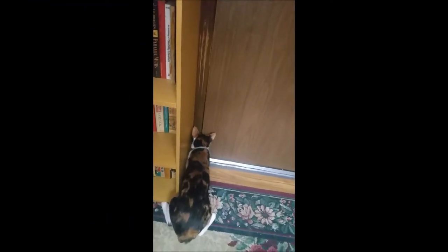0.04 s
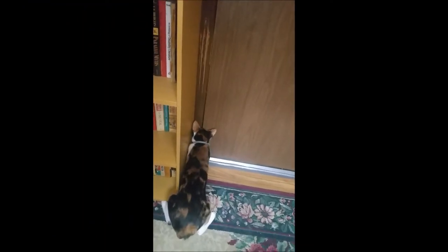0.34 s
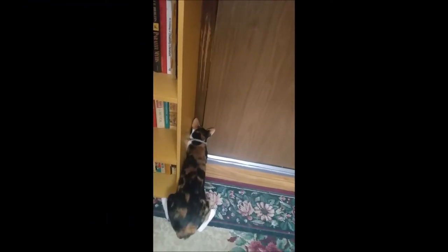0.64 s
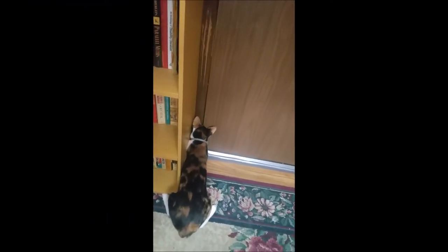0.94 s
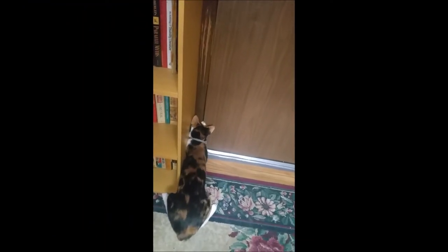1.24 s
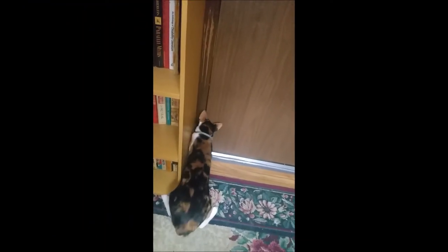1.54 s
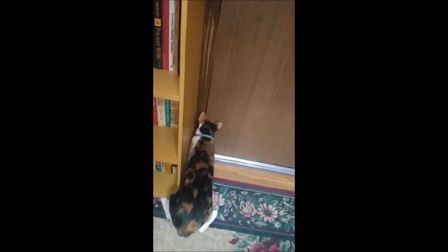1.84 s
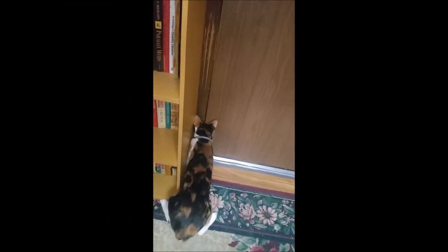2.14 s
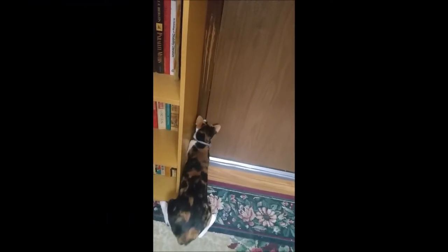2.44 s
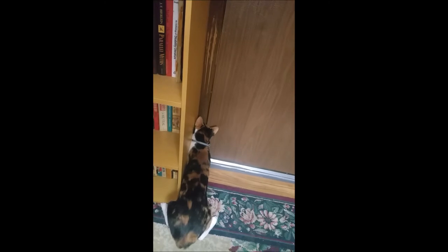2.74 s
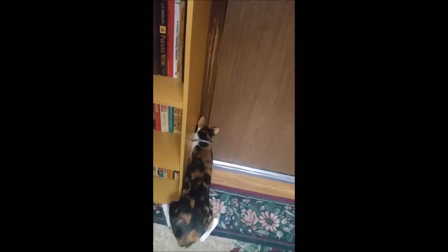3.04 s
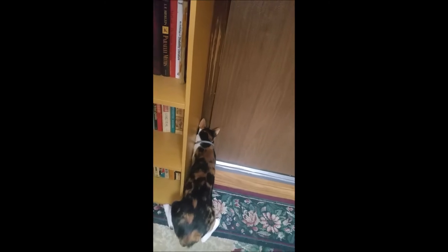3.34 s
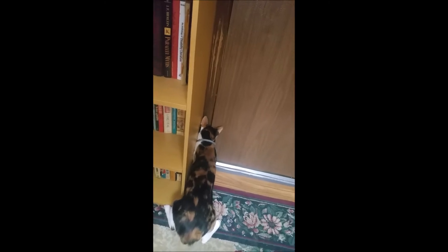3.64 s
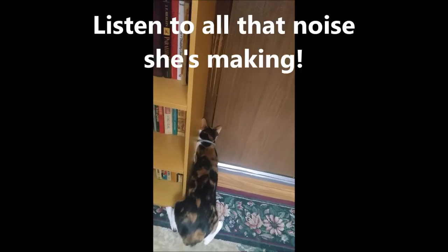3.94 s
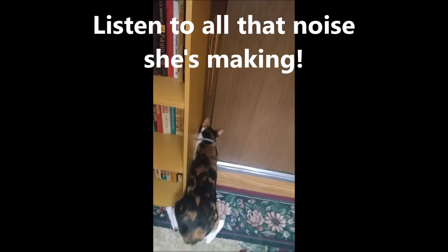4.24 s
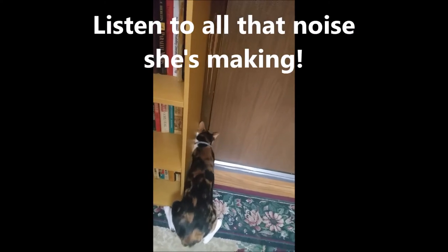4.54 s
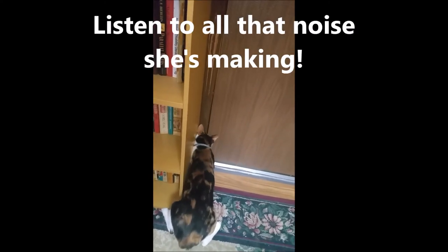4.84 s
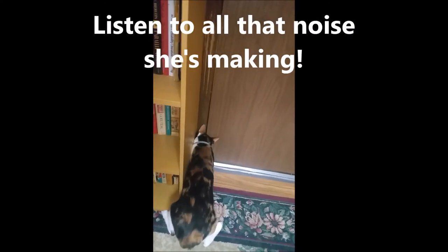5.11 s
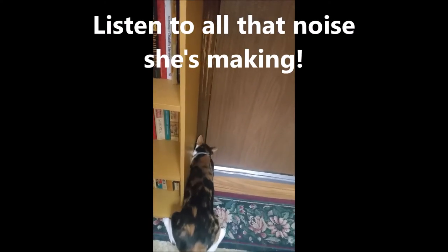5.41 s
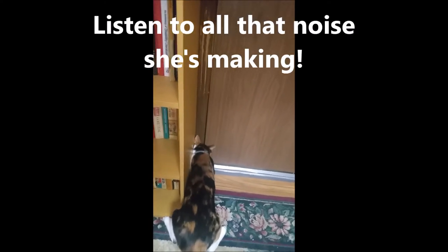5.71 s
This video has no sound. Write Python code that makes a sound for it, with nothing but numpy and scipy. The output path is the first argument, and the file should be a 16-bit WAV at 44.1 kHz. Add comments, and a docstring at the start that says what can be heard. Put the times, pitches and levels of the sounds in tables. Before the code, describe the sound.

A cat tugs at a closed wooden door, making irregular hollow knocks and rattles with light claw ticks in between.

```python
"""Cat pawing at a closed door

A small carpeted room, a stereo pair of microphones a step behind the cat. Each tug knocks the loose
wooden door against its latch and frame: a crack, the panel's hollow ring and a slow boom of the whole
leaf. Between tugs her claws tick and scrape along the edge, over a quiet rumble and an appliance hum."""
import sys
import numpy as np
from scipy import signal
from scipy.fft import rfft, irfft, next_fast_len
from scipy.io import wavfile
from scipy.ndimage import map_coordinates

SR = 44100
rng = np.random.default_rng(int(sys.argv[2]) if len(sys.argv) > 2 else 0)


def generate_wav(sig):
    """Save sig (samples, or channels by samples) to the path in sys.argv[1] as 16-bit PCM at SR."""
    pcm = np.round(np.clip(np.atleast_2d(sig).T, -1, 1) * 32767).astype(np.int16)
    wavfile.write(sys.argv[1], SR, pcm)


N = 263277
AGE = np.arange(SR * 3 // 5) / SR  # time since a contact [s]

# the door hitting its frame, some tugs rattling it several times:
# (time [s], latch crack [dB], panel thud [dB], edge snap [dB])
DOOR_KNOCKS = [(.833, -29, -39, -56), (.837, -19, -30.5, -36.5), (0.8497, -26, -29, -35.5),
               (0.8745, -29, -33, -42.5), (1.391, -55, -52, -71), (1.457, -50, -48, -68),
               (1.5254, -27, -42, -49), (1.602, -48.5, -49, -57.5), (1.8483, -15, -26, -25),
               (1.862, -22.5, -29.5, -38), (2.2259, -20.5, -23.5, -35), (3.208, -47, -51, -62.5),
               (3.346, -30, -31, -42.5), (3.4339, -39.5, -45, -61.5), (3.525, -47.5, -49, -62),
               (4.2363, -56.5, -48, -69), (4.369, -36, -32, -43), (4.377, -28, -31, -43),
               (4.3931, -26, -21.5, -33.5), (4.842, -45, -56, -57), (4.9194, -18.5, -26.5, -32),
               (5.216, -30, -35.5, -49), (5.239, -39, -35, -52), (5.2646, -28.5, -25, -35),
               (5.8661, -18.5, -44, -32)]
# a knock on wood from a step away: (frequency [Hz], spectral density [dB])
WOOD_SPECTRUM = [(59, -25), (100, 0.5), (243, 10.5), (340, 0), (420, 6.5), (576, -14.5), (758, -10.5),
                 (898, -21.5), (977, -13), (1180, -22.5), (2370, -13), (4100, -29.5), (6120, -28.5),
                 (7890, -42), (15500, -40)]


def door_knocks():
    """The loose door hits latch and frame: low parts swell and linger, high parts crack and die."""
    track = np.zeros((2, N))
    lean_left = amp([[.8], [-.8]])
    for time, crack_db, thud_db, snap_db in DOOR_KNOCKS:
        boom_db = -32 + .54 * (thud_db + 34)  # the leaf booms even under a light push
        clack_db = .52 * crack_db + .48 * thud_db - 4  # the frame clacks between latch and panel
        latch_hz = 2492 * np.exp(.037 * rng.standard_normal())
        boom = amp(boom_db) * leaf_boom(hz=53.95, rise=.011, t60=.34)
        ring = amp(-1) * panel_ring(thud_db, clack_db)
        thud = burst(WOOD_SPECTRUM, thud_db + 2, band_hz=(110, 420),
                     rise=.0044, t60=.14, room_db=-12, room_t60=.27)
        clack = burst(WOOD_SPECTRUM, clack_db + 1.5, band_hz=(520, 1565),
                      rise=.001, t60=.05, room_db=-3.5, room_t60=.22)
        crack = burst(WOOD_SPECTRUM, crack_db - 9.5, band_hz=(860, 3600),
                      rise=.0001, t60=.032, room_db=-5, room_t60=.23)
        # crossed band edges leave a narrow peak at the latch's pitch
        ping = burst(WOOD_SPECTRUM, crack_db - 8, band_hz=(1.05 * latch_hz, .94 * latch_hz),
                     rise=.000199, t60=.032, room_db=-4.5, room_t60=.075)
        snap = burst(WOOD_SPECTRUM, snap_db + 4, band_hz=(3740, 12700),
                     rise=.0002, t60=.032, room_db=-9, room_t60=.19)
        add(track, time, (boom + ring + thud + clack) * lean_left + crack + ping + snap)
        # the bare contact reaches the microphones ahead of the ringing
        add(track, time, amp(clack_db + .5) * impact(hz=799, t60=.075))
        add(track, time, amp(crack_db) * impact(hz=latch_hz, t60=.019))
        add(track, time, amp(snap_db + 12) * impact(hz=7070, t60=.00088))
    return track


# modes of the door panel: (frequency [Hz], level [dB], tail t60 [s])
PANEL_MODES = [(98.6, -6.5, 0.34), (154, -9, 0.49), (182.5, -3, 0.24), (244.9, 1.5, 0.13), (264, -0.5, 0.2),
               (316, -7, 0.19), (357.4, -5.5, 0.23), (406.4, -3, 0.19), (442.8, -2.5, 0.27),
               (488, -9.5, 0.36), (512, -21.5, 0.21), (679, 2, 0.047), (714, -13.5, 0.056),
               (785.5, -1, 0.16), (888, -27, 0.26), (996, -18.5, 0.09)]


def panel_ring(thud_db, clack_db, scatter_db=1.8, scatter_rad=.64, rise_cycles=1.3):
    """The panel's modes, struck a little differently each time; low ones build up slowly."""
    hz, mode_db, tail_t60 = np.transpose(PANEL_MODES)[:, :, None]
    strength, shift, spread = rng.standard_normal((3, len(PANEL_MODES), 1))
    blow_db = np.interp(hz, [480, 650], [thud_db, clack_db])
    gain = amp(mode_db + blow_db + scatter_db * strength)
    swell = 1 - np.exp(-AGE * hz / rise_cycles)
    envelope = gain * swell * decay(t60=.1, tail_db=-8, tail_t60=tail_t60)
    # bending waves travel faster the higher they are, so their phase lag grows as the root of frequency
    lag = np.pi * np.sqrt(hz / 2)
    phase = 2 * np.pi * hz * AGE - lag + scatter_rad * shift
    apart = spread * stereo_angle(hz)
    return np.array([np.sum(envelope * np.sin(phase + side * apart), axis=0) for side in (1, -1)])


def leaf_boom(hz, rise, t60):
    """The whole leaf flexes on its hinges."""
    swell = 1 - np.exp(-AGE / rise)
    return np.sin(2 * np.pi * hz * AGE) * swell * amp(-60 * AGE / t60)


# claws catching and letting go at the door's edge: (time [s], level [dB], pitch [Hz])
CLAW_TICKS = [(0.387, -47, 2040), (1.05, -49, 1970), (1.0828, -44.5, 3100), (1.1662, -47, 5230),
              (1.2271, -43, 2560), (2.4158, -35, 2100), (2.6718, -35.5, 2020), (2.6973, -31, 2050),
              (2.7424, -24.5, 2300), (2.783, -27, 2570), (2.81, -21.5, 2610), (2.9815, -25.5, 5900),
              (3.038, -17.5, 2580), (3.5357, -45, 2350), (3.5816, -44, 2480), (4.0299, -38, 2490),
              (4.5495, -35, 2930), (5.474, -35, 2680), (5.487, -34.5, 1610)]
# a claw on wood from a step away: (frequency [Hz], spectral density [dB])
CLAW_SPECTRUM = [(400, -2.5), (750, 1.5), (1300, -5.5), (2200, -1.5), (2900, -6.5), (4200, -15.5),
                 (5800, -8.5), (6800, -12), (8000, -23), (11000, -19), (15500, -24.5)]


def claw_ticks():
    """A claw slips off the edge with a sharp click and a light tap in the wood."""
    track = np.zeros((2, N))
    for time, click_db, hz in CLAW_TICKS:
        tap_db = -42 + .58 * (click_db + 22.5)  # the tap grows more slowly than the click
        click = burst(CLAW_SPECTRUM, click_db - 9.5, band_hz=(2220, 12000),
                      rise=.0001, t60=.019, room_db=-8, room_t60=.15)
        ping = burst(CLAW_SPECTRUM, click_db - 3, band_hz=(.8 * hz, 1.4 * hz),
                     rise=.00057, t60=.012, room_db=-22.5, room_t60=.21)
        tap = burst(CLAW_SPECTRUM, tap_db, band_hz=(295, 1500),
                    rise=.0013, t60=.031, room_db=-4.5, room_t60=.21)
        add(track, time, click + ping + tap)
        add(track, time, amp(click_db - 5.5) * impact(hz=5800, t60=.0029))
    return track


# claws dragged over the door: (time [s], length [s], rasp level [dB])
CLAW_STROKES = [(0.384, .026, -56.5), (0.476, 0.097, -67.5), (0.819, 0.017, -46), (1.064, 0.14, -64),
                (1.198, 0.02, -55), (1.592, 0.07, -61), (2.407, 0.07, -51.5), (2.517, 0.11, -58.5),
                (2.645, 0.071, -45), (2.752, 0.033, -53), (4.358, 0.029, -38.5), (4.559, 0.07, -59.5),
                (4.684, 0.14, -64.5), (5.017, 0.24, -71.5), (5.481, 0.036, -49.5), (5.582, .13, -64.5)]


def claw_scrapes(slips_per_s=400, unevenness_db=5.5, room_db=2, room_t60=.12):
    """Dragged claws catch on the grain in many tiny slips, blurred by the room."""
    track = np.zeros((2, N))
    n = len(AGE)
    for time, length, rasp_db in CLAW_STROKES:
        grit_db = -58 + .62 * (rasp_db + 49)  # the lighter the stroke, the larger its share of grit
        pressure = np.sqrt(np.abs(np.sin(np.pi * AGE / length)) * (AGE < length))
        strength = amp(unevenness_db * rng.standard_normal(n)) * rng.choice([-1, 1], n)
        slips = pressure * strength * (rng.random(n) < slips_per_s / SR)
        tail = rng.standard_normal((2, n)) * amp(-60 * AGE / room_t60)
        reflections = signal.fftconvolve(slips[None], tail / np.linalg.norm(tail[0]), axes=1)[:, :n]
        at_mics = slips + amp(room_db) * reflections
        rasp = amp(rasp_db) * colour(at_mics, CLAW_SPECTRUM, 710, 4200)
        grit = amp(grit_db) * colour(at_mics, CLAW_SPECTRUM, 3640, 23000)
        add(track, time, (rasp + grit) * np.sqrt(np.mean(pressure ** 2)))
    return track


# room tone at the microphones: (frequency [Hz], spectral density [dB])
ROOM_SPECTRUM = [(12, -33), (20, 0), (65, -2.5), (128, -3), (423, -16.5), (458, -22.5), (686, -24),
                 (744, -27.5), (2500, -37), (3250, -78.5), (5500, -120)]
# the room's low rumble: (time [s], level [dB])
RUMBLE_LEVELS = [(0.0, -59.5), (0.91, -56.5), (1.31, -57), (1.71, -52.5), (2.26, -57), (3.57, -52),
                 (5.97, -52)]


def room_tone():
    """An uneven low rumble, stronger on the left, and a soft rush that follows its level."""
    rumble_db = curve(RUMBLE_LEVELS)
    rush_db = -64 + .89 * (rumble_db - rumble_db.mean())
    rumble = amp(rumble_db + .34 * wobble(7.7)) * noise(ROOM_SPECTRUM, 24, 480)
    rush = amp(rush_db) * noise(ROOM_SPECTRUM, 512, 1850)
    return rumble * amp([[1.1], [-1.1]]) + rush


# the appliance's tones: (frequency [Hz], relative level [dB])
HUM_PARTIALS = [(705, -6), (1410, -16.5)]
# its hum at the microphones: (time [s], level [dB])
HUM_LEVELS = [(0, -65), (.8, -63.5), (1.4, -67.5), (5.97, -64.5)]


def appliance_hum():
    """An appliance hums faintly in the background, its tones wavering together in pitch."""
    wavering_time = (np.arange(N) + np.cumsum(.00274 * wobble(7.9))) / SR
    tones = sum(amp(db) * np.sin(2 * np.pi * hz * wavering_time) for hz, db in HUM_PARTIALS)
    return amp(curve(HUM_LEVELS)) * np.sqrt(2) * tones


# the microphones' own noise: (frequency [Hz], spectral density [dB])
HISS_SPECTRUM = [(1060, -23), (1800, 3.5), (3110, -8), (4010, -9), (5560, -16), (10700, -13.5),
                 (15800, -12.5)]


def microphone_hiss():
    """A steady, thin hiss from the microphones lies under everything."""
    return amp(-69.5) * noise(HISS_SPECTRUM, 2100, 26000)


# how alike the room sounds at the two microphones: (frequency [Hz], coherence [0-1])
MIC_COHERENCE = [(60, 0.94), (250, 0.97), (640, 0.38), (1400, 0), (3000, 0.016), (15000, 0)]


def stereo_angle(hz):
    """Angle from mid towards side [rad]: lows reach the pair nearly alike, highs unrelated."""
    return np.arccos(np.clip(along(MIC_COHERENCE, hz), -1, 1)) / 2


def burst(spectrum, db, band_hz, rise, t60, room_db, room_t60):
    """Dense resonances of one contact: a short direct part, then the room's answer; times in seconds."""
    envelope = (1 - np.exp(-AGE / rise)) * decay(t60, room_db, room_t60)
    sound = envelope * noise(spectrum, *band_hz, samples=len(AGE))
    return amp(db) * unit(sound) * np.sqrt(np.mean(envelope ** 2))


def impact(hz, t60):
    """The first wavefront of a hard contact: three pitches around hz, alike at both microphones."""
    t = AGE[:SR // 12]
    pitches = hz * np.exp(.37 * rng.uniform(-1.07, 1, (3, 1)))
    return np.mean(np.sin(2 * np.pi * pitches * t), axis=0) * amp(-60 * t / t60)


def decay(t60, tail_db, tail_t60):
    """A quick fall that runs out into a weaker, slower tail."""
    return np.hypot(amp(-60 * AGE / t60), amp(tail_db - 60 * AGE / tail_t60))


def noise(spectrum, lo_hz, hi_hz, samples=N):
    """Stereo noise in one band of a spectrum, at rms 1."""
    return colour(rng.standard_normal((2, samples)), spectrum, lo_hz, hi_hz)


def colour(pair, spectrum, lo_hz, hi_hz):
    """Two signals, filtered to a band of a spectrum, become mid and side of a stereo sound at rms 1."""
    n = pair.shape[-1]
    size = next_fast_len(n)
    hz = np.fft.rfftfreq(size, 1 / SR) + 1e-3
    gain = amp(along(spectrum, hz)) / np.sqrt((1 + (lo_hz / hz) ** 10) * (1 + (hz / hi_hz) ** 10))
    angle = stereo_angle(hz)
    mid, side = irfft(rfft(pair, size) * gain * [np.cos(angle), np.sin(angle)], size)[:, :n]
    return unit(np.array([mid + side, mid - side]))


def amp(db):
    """Decibels to gain."""
    return 10 ** (np.asarray(db) / 20)


def unit(x):
    """Each channel at rms 1."""
    return x / np.sqrt(np.mean(x ** 2, axis=-1, keepdims=True) + 1e-20)


def along(points, hz):
    """(frequency [Hz], value) points read on a log axis."""
    frequencies, values = np.transpose(points)
    return np.interp(np.log(hz + 1), np.log(frequencies + 1), values)


def curve(points):
    """(time [s], value) points read at every sample."""
    return np.interp(np.arange(N) / SR, *np.transpose(points))


def wobble(rate):
    """A smooth random curve, rate knots a second."""
    knots = rng.standard_normal(int(N * rate / SR) + 4)
    return map_coordinates(knots, [np.arange(N) * rate / SR])


def add(track, time, sound):
    """Mix a sound into the track at a time in seconds."""
    part = track[:, round(time * SR):][:, :sound.shape[-1]]
    part += sound[..., :part.shape[-1]]


def scene():
    """Door and claws a step ahead, the quiet room all around."""
    cat_at_door = claw_scrapes() + door_knocks() + claw_ticks()
    return cat_at_door + room_tone() + microphone_hiss() + appliance_hum()


def record(dry):
    """The left microphone is slightly nearer; the recorder keeps nothing above its band limit."""
    lead_s, top_hz = np.array([[1e-5], [-1e-5]]), 16150
    size = next_fast_len(N + SR // 2)
    hz = np.fft.rfftfreq(size, 1 / SR)
    response = np.exp(2j * np.pi * hz * lead_s) * (hz < top_hz)
    return irfft(rfft(dry, size) * response, size)[:, :N]


dry = scene()
out = record(dry)
generate_wav(out)
```